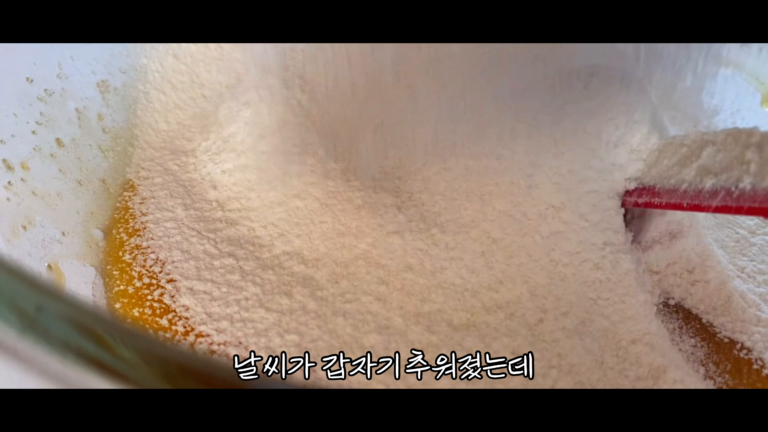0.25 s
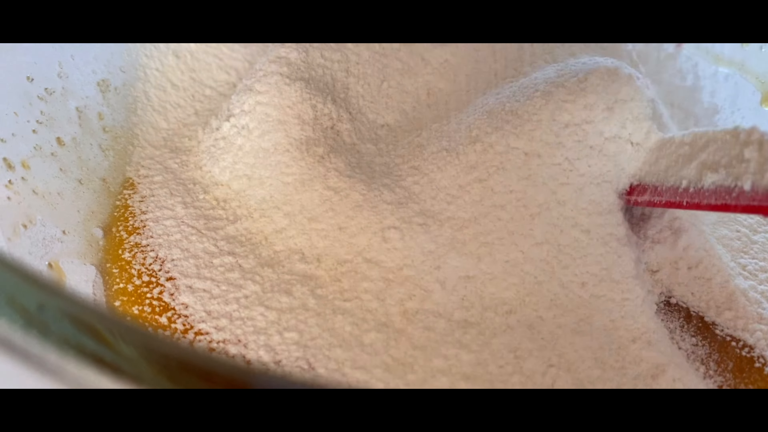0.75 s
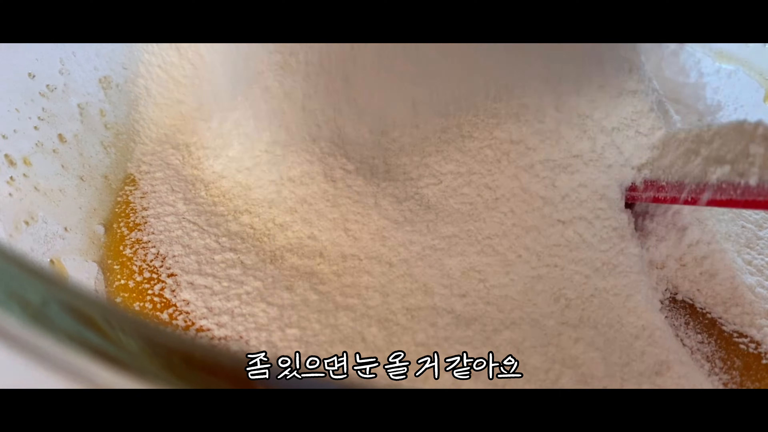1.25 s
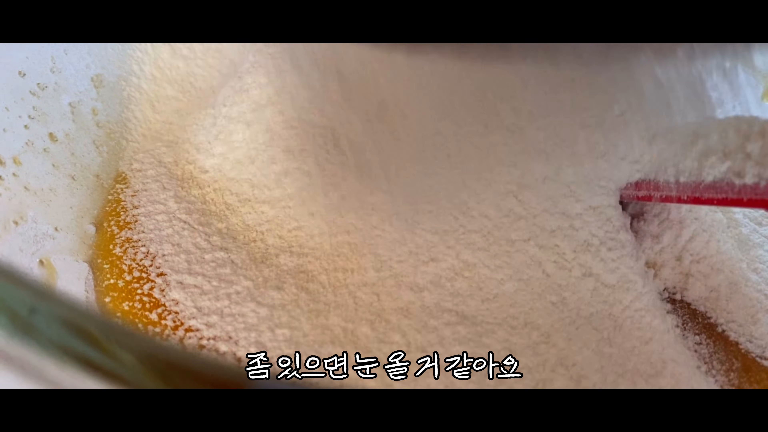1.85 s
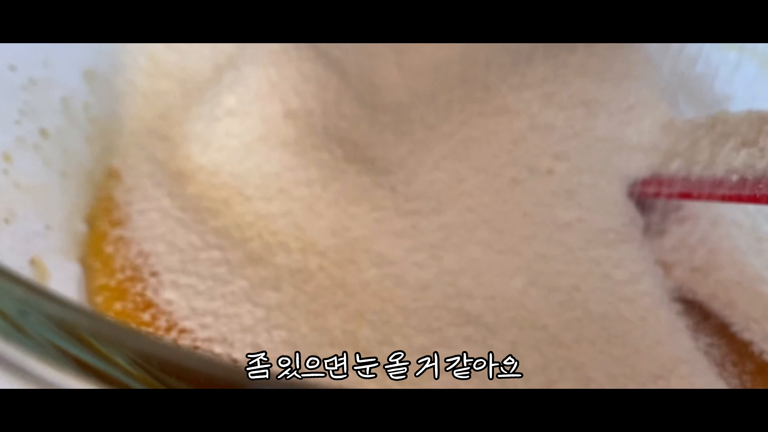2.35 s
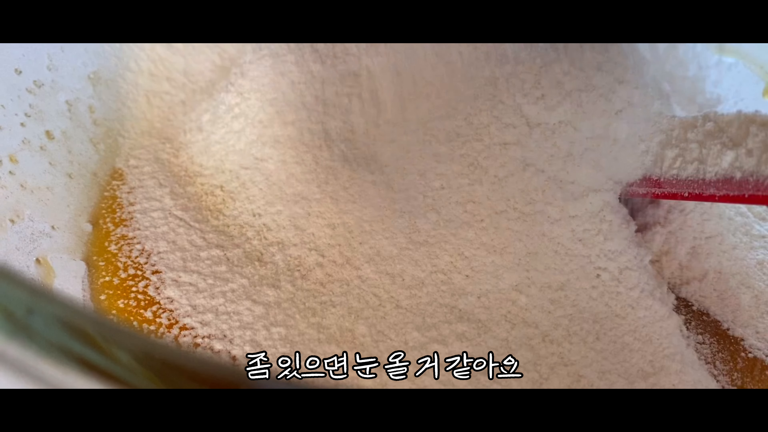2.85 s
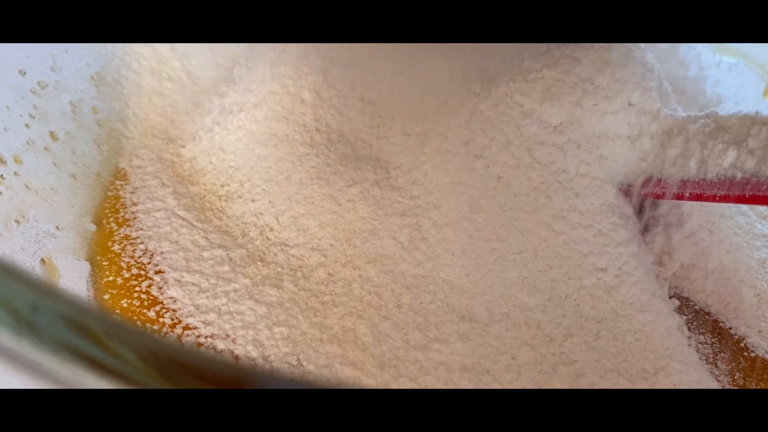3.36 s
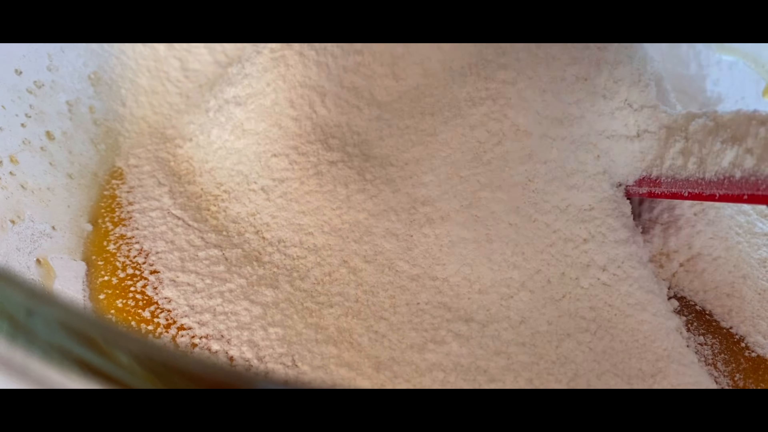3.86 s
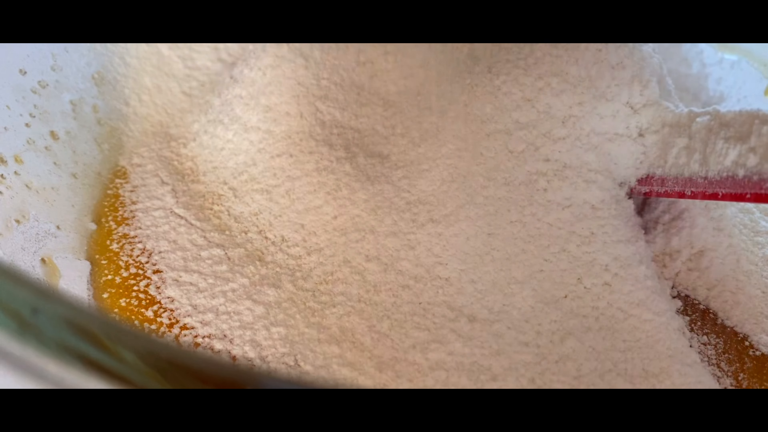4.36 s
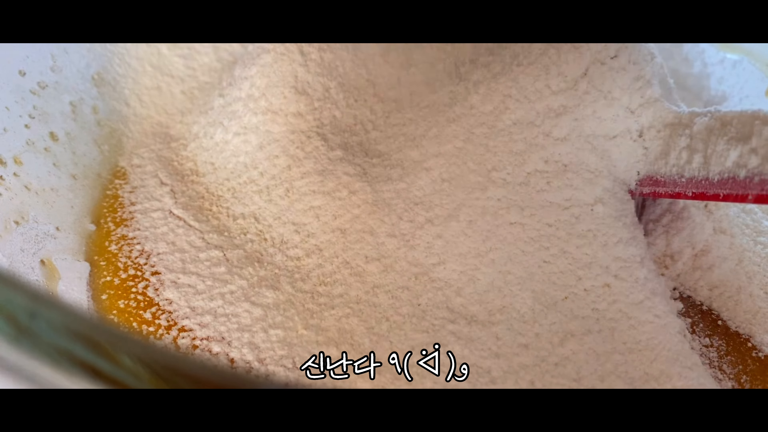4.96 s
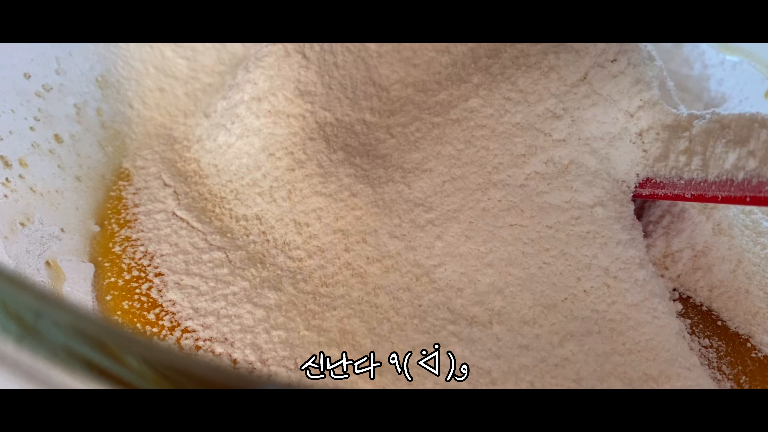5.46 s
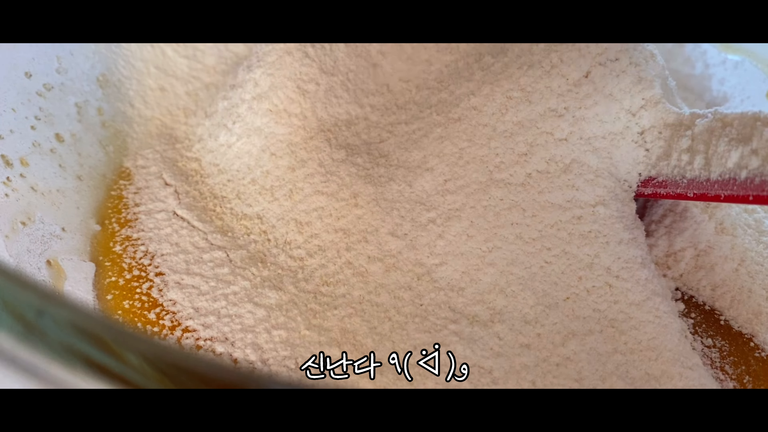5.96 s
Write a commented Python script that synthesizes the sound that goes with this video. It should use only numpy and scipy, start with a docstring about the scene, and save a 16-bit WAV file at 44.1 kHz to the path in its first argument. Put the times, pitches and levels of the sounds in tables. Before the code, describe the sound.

Steady rapid tapping of a fine mesh sieve, heard very close in stereo. Rounded thuds drop quickly in pitch, some purely bassy, others with a woody knock from bowl and worktop. Thin dry flour swishes surround every hit, and tiny metallic ticks are barely noticeable. The rhythm continues throughout, dipping softer at about a quarter of the way, over quiet room rumble and a faint appliance whine.

```python
"""Sifting flour by hand

Flour is sifted into a mixing bowl in a quiet kitchen, heard from close by. About five times a second
the sieve is swung against a hand: friction of flour on mesh gives a rising swish of noise, impact gives
a rim tick and a soft thud that dispersion makes fall in pitch, and the flour slides back as a second
swish. Reflections surround these sounds; behind them lie a low rumble, faint hiss and an appliance's whine."""
import sys
import numpy as np
from scipy import signal
from scipy.fft import rfft, irfft, next_fast_len
from scipy.io import wavfile

SR = 44100
rng = np.random.default_rng(int(sys.argv[2]) if len(sys.argv) > 2 else 0)


def wav_out(sig):
    """Save sig, one row per channel (or a flat mono array), as 16-bit PCM at SR to the path in sys.argv[1]."""
    wavfile.write(sys.argv[1], SR, np.round(np.clip(np.atleast_2d(sig).T, -1, 1) * 32767).astype(np.int16))


N = 273855
TIME = np.arange(N) / SR
HZ = np.maximum(np.fft.rfftfreq(next_fast_len(N + SR // 2), 1 / SR), 1)
SIZE = 2 * (len(HZ) - 1)

# Taps of the sieve on the hand. Each row: time in seconds, then relative levels in dB of the thud,
# its hardness (knock against thud), the rim tick and the flour swish.
TAPS = [(0.1384, -39.5, -8.0, -63.5, -77), (0.344, -42.5, -6, -71, -78.5),
        (0.5525, -43.5, -15.5, -62.5, -76.5), (0.7521, -44.5, -34.5, -76, -87.5),
        (0.9553, -42.5, -23.5, -72, -79.5), (1.157, -40.5, -23.5, -70.5, -77),
        (1.358, -42.5, -21.5, -69, -77.0), (1.5568, -49, -18, -92, -81), (1.7521, -55.5, -29, -97, -84.5),
        (1.9175, -41.0, -17, -72, -79), (2.1186, -41, -14, -64.5, -79), (2.3223, -42, -8, -66.5, -79.5),
        (2.5304, -43.5, -31, -75.5, -80), (2.717, -45.5, -5, -65, -78), (2.9105, -46, -7.5, -74.5, -84),
        (3.1042, -44.5, -8.5, -81, -83), (3.308, -43, -14.0, -67, -78.5), (3.5047, -46, -4, -67.5, -79.5),
        (3.7029, -46.5, -19.5, -72.5, -87.5), (3.9032, -44.5, -8.5, -71, -80.5),
        (4.1067, -46.5, -8, -72, -80.5), (4.3097, -44.0, -12, -69.5, -80.5), (4.51, -47, -9, -77, -82.5),
        (4.7146, -45.5, -9.5, -78, -77.5), (4.9153, -45, -10.5, -67.0, -77.5),
        (5.1193, -47, -6, -78.5, -79.5), (5.3214, -47.5, -7.0, -71.5, -82.5),
        (5.5335, -48.5, -5.5, -76, -82), (5.7488, -44.5, -20, -74.5, -79), (5.9494, -45, -9.0, -76, -82)]


def thuds():
    """Superposition: the thuds of all taps add linearly, tails overlapping."""
    out = np.zeros((2, N + SR))
    for s, thud_db, hardness_db, _, _ in TAPS:
        wave = thud(thud_db, hardness_db)
        start = round(s * SR)
        out[:, start:start + wave.shape[1]] += wave
    return out[:, :N]


# Colour of a fully hard thud. Each row: frequency in Hz, relative level in dB.
THUD_COLOUR = [(20, -37.5), (30, -24), (40, -11), (50, 2.5), (65, 2.5), (120, 1), (190, -7), (385, -3.5),
               (520, -16.5), (700, -19), (1000, -30.5), (1200, -27.5), (1450, -71)]
# Left-right balance of the thud. Each row: frequency in Hz, left above right in dB.
THUD_PAN = [(80, 0.8), (160, 1.0), (280, 4), (500, 9), (1000, 6)]
# Hollow modes of bowl and worktop. Each row: frequency in Hz, width in Hz, typical strength in dB.
HOLLOW_MODES = [(141, 17, -11.5), (193.5, 8, 2.5), (256.5, 9.6, 7), (358.2, 15.8, 0.5), (589, 19, 1),
                (642, 45, 7.5), (774, 17, 5.5), (824, 13, -2), (940, 22, 0.5), (1024, 54, 2.5)]
# A fleshy contact gives only bass, a bony one adds the knock.
# Each row: frequency in Hz, share of the hardness that applies.
HARDNESS_SHARE = [(90, 0), (190, 0.18), (370, 0.89), (720, 0.96)]
# First reflections off bowl and wall. Each row: delay in seconds, left level in dB, right level in dB.
ECHOES = [(.0076, -34, -8), (0.0217, -15, -17.5)]
THUD_GAIN_DB = 54.5
DELAY_CYCLES, DELAY_REFERENCE_HZ = 1.3065, 15.53


def thud(thud_db, hardness_db, size=16384, mode_spread_db=3.5, echo_low_cut_hz=200):
    """Dispersion and resonance: each pitch arrives equally many of its own cycles late, so the thud falls."""
    hz = np.maximum(np.fft.rfftfreq(size, 1 / SR), 1)
    dispersion = np.exp(-2j * np.pi * DELAY_CYCLES * np.log(hz / DELAY_REFERENCE_HZ))
    knock_db = hardness_db * at_hz(HARDNESS_SHARE, hz)
    contact = from_db(THUD_GAIN_DB + thud_db + knock_db + at_hz(THUD_COLOUR, hz))
    pan = from_db(at_hz(THUD_PAN, hz) * [[.5], [-.5]])
    # the hand never lands on quite the same spot, so each mode reaches each port with a new strength
    modes = 0
    for mode_hz, width_hz, mode_db in HOLLOW_MODES:
        strength = from_db(mode_db + mode_spread_db * rng.standard_normal((2, 1)))
        detuning = mode_hz / width_hz * (hz / mode_hz - mode_hz / hz)
        modes = modes + strength / (1 + 1j * detuning)
    # the first reflections return all but the bass
    high_pass = signal.butter(4, echo_low_cut_hz, "high", analog=True)
    low_cut = signal.freqs(*high_pass, hz)[1]
    echoes = 0
    for delay_s, left_db, right_db in ECHOES:
        echoes = echoes + from_db([[left_db], [right_db]]) * np.exp(-2j * np.pi * hz * delay_s)
    # the sieve moves between taps, so the later reflections are new each time
    paths = pan * (1 + modes) + low_cut * echoes + kitchen(hz)
    return irfft(dispersion * contact * paths)[:, :size // 2]


# Spectrum of the forward swish. Each row: frequency in Hz, relative density in dB per Hz.
SWISH = [(500, -11), (1000, 7.5), (1500, -2), (2400, -2), (2950, -3.5), (3500, -10.5), (4500, -2.5),
         (5300, -7.5), (7200, 1), (9500, -4.5), (11400, -0.5), (13500, -6), (15800, -9)]
# Spectrum of the slide back. Each row: frequency in Hz, relative density in dB per Hz.
BACK_SLIDE = [(1000, 10), (3000, -7), (5500, -4), (7500, 2.5), (9500, -3), (11300, 5.5), (12200, -2),
              (13000, 3), (14000, -3), (15800, -6.5)]
# an ordinary swing, and the time before the stop at which its swish sets in
USUAL_THUD_DB, USUAL_HARDNESS_DB, USUAL_SWISH_DB = -44, -10, -80
SWISH_RISE_S = 0.033
# weaker and softer taps come from slower swings: dB of slowness per dB
SLOW_PER_THUD, SLOW_PER_HARDNESS = .19, 0.09
# slide back: usual level, dB gained per dB of swish and of slowness, end after the tap, fade time
BACK_DB, BACK_PER_SWISH, BACK_PER_SLOWNESS = -81.5, 0.57, 1.8
BACK_HOLD_S, BACK_FADE_S = 0.092, .02
# the flour crunches as it piles up just before the stop: dB above the swish, lead, half-width
CRUNCH_DB, CRUNCH_LEAD_S, CRUNCH_S = 4.5, .0012, 0.0019


def flour(stop_s=0.0025, swish_db=8.0, fastest_before_s=0.0042, grain_db=1.0, clump_db=0.94):
    """Friction noise: flour speeds up until the stop, then slides back; slow swings lengthen the swish."""
    forward, back = np.zeros(N), np.zeros(N)
    for s, thud_db, hardness_db, _, slide_db in TAPS:
        slowness_db = SLOW_PER_THUD * (USUAL_THUD_DB - thud_db)
        slowness_db += SLOW_PER_HARDNESS * (USUAL_HARDNESS_DB - hardness_db)
        rise_s = SWISH_RISE_S * from_db(slowness_db)
        stopped = step(s, stop_s)
        speed = bell(s - fastest_before_s, rise_s - fastest_before_s)
        crunch = 1 + (from_db(CRUNCH_DB) - 1) * bell(s - CRUNCH_LEAD_S, CRUNCH_S)
        forward += from_db(slide_db + swish_db) * speed * crunch * (1 - stopped)
        # a slow swing leaves more flour to slide back
        back_db = BACK_DB + BACK_PER_SWISH * (slide_db - USUAL_SWISH_DB) + BACK_PER_SLOWNESS * slowness_db
        back += from_db(back_db) * stopped * (1 - step(s + BACK_HOLD_S, BACK_FADE_S))
    # fine grains and small lumps make the hiss uneven
    uneven = from_db(grain_db * drift(700) + clump_db * drift(40))
    return uneven * (forward * mesh_noise(SWISH) + back * mesh_noise(BACK_SLIDE))


# Stray clicks of the sieve. Each row: time in seconds, level in dB.
CLICKS = [(.400, -89), (6.046, -83)]
# Spectrum of the rim's contact noise. Each row: frequency in Hz, relative density in dB per Hz.
TICK = [(600, -19), (1300, 10), (1900, 9.5), (2400, 3), (2950, 0), (3600, -7), (5400, 0), (7000, -9.5),
        (9000, -10.5), (12000, -9.5), (15800, -16)]
# Spectrum of the rim's after-ring. Each row: frequency in Hz, relative density in dB per Hz.
RIM_RING = [(600, -16), (1200, -4.5), (1900, -3), (2900, -2), (3600, -16), (5400, 3.5), (7000, -1),
            (9000, -18), (15800, -27)]


def ticks(tick_db=4.5, contact_s=0.0027, rebound_s=0.0058, rebound_db=-10, ring_db=-13,
          ring_t60_s=0.24, click_s=0.001, rough_db=2.0):
    """Impact and damping: the metal rim ticks, rebounds once and buzzes briefly, damped by the flour."""
    force, ring = np.zeros(N), np.zeros(N)
    for s, click_db in CLICKS:
        force += from_db(click_db) * bell(s, click_s)
    for s, _, _, rim_db, _ in TAPS:
        rebound = from_db(rebound_db) * bell(s + rebound_s, contact_s)
        force += from_db(rim_db + tick_db) * (bell(s, contact_s) + rebound)
        decay_db = -60 * np.clip((TIME - s) / ring_t60_s, 0, 2)
        ring += (TIME > s) * from_db(rim_db + ring_db + decay_db)
    rough_force = force * from_db(rough_db * drift(760))
    return rough_force * mesh_noise(TICK) + ring * mesh_noise(RIM_RING)


# Direct sound from the mesh. Each row: frequency in Hz, share of the power that arrives straight.
DIRECT_SHARE = [(1000, .05), (5500, .2), (7000, .6), (9000, .985), (16000, .995)]
PORT_LAG_S = .000225


def mesh_noise(colour):
    """Direct and diffuse fields: the straight part reaches the left port late and in opposite phase."""
    share = np.clip(at_hz(DIRECT_SHARE), 0, 1)
    left_port = -np.exp(-2j * np.pi * HZ * PORT_LAG_S)
    ports = np.array([left_port, np.ones(len(HZ))])
    direct = np.sqrt(share) * ports * white(1)
    return coloured(direct + np.sqrt(1 - share) * diffuse(), colour)


# Kitchen reverberation. Each row: frequency in Hz, level against the direct sound in dB.
KITCHEN = [(40, -19), (110, -10), (200, -10), (350, -3), (700, 5), (1500, -5), (4000, -3.5), (9000, -19.5),
           (16000, -24)]
KITCHEN_T60_S = 0.24


def kitchen(hz=HZ, first_echo_s=.005):
    """Reverberation: response of dense reflections from worktop and walls, decaying exponentially."""
    scatter = rms_one(irfft(diffuse(hz)))
    t = np.arange(scatter.shape[1]) / SR
    decay = (t > first_echo_s) * from_db(-60 * np.minimum(t / KITCHEN_T60_S, 2))
    unit_decay = decay / np.sqrt(np.sum(decay ** 2))
    return rfft(scatter * unit_decay) * from_db(at_hz(KITCHEN, hz))


# Spectrum of the room noise. Each row: frequency in Hz, relative density in dB per Hz.
BACKGROUND = [(20, -7.5), (45, -11.5), (62, 7.5), (85, -9), (140, -6), (200, 0), (300, -2.5), (400, -8.5),
              (500, -13.5), (700, -18), (1000, -21.5), (1500, -26.5), (2350, -22), (2550, -49.5)]
# Spectrum of the faint hiss. Each row: frequency in Hz, relative density in dB per Hz.
AIR = [(1500, -24), (2600, 4), (3500, -2.5), (5800, -1.5), (6100, 5.5), (6450, 6.5), (6700, -1),
       (9000, -12.5), (13000, -8.5), (15800, -20)]
# Whine of the appliance. Each row: frequency in Hz, typical level in dB.
WHINE = [(1809, -93.5), (1922, -96), (2094, -90), (2181, -99), (2314, -94), (2404, -100), (6207, -103)]
# Course of the low room rumble. Each row: time in seconds, relative level in dB.
RUMBLE = [(0.05, -64), (0.27, -64.5), (1.29, -65.5), (1.58, -69), (2.28, -63.5), (3.63, -68), (4.79, -67),
          (6.15, -69)]
BACKGROUND_DB, AIR_DB = -63.5, -87.5
# share of the rumble's course that applies, random waver on top of it, upper edge of the rumble
RUMBLE_SWING, RUMBLE_WAVER_DB, RUMBLE_TOP_HZ = 0.77, 1.5, 610


def background(waver_rad=1.1, waver_db=3.0):
    """Modulation: rumble wavers in level, whine tones in level and phase, over a steady faint hiss."""
    room_spectra = diffuse() / (1 + (HZ / 3000) ** 8)
    room = from_db(BACKGROUND_DB) * coloured(room_spectra, BACKGROUND)
    rumble = irfft(rfft(room, SIZE) / (1 + (HZ / RUMBLE_TOP_HZ) ** 4))[:, :N]
    rumble_db = np.interp(TIME, *np.transpose(RUMBLE))
    swing_db = RUMBLE_SWING * (rumble_db - rumble_db.mean())
    swell = from_db(swing_db + RUMBLE_WAVER_DB * drift(8))
    hiss = from_db(AIR_DB) * coloured(diffuse(), AIR)
    out = room + (swell - 1) * rumble + hiss
    for hz, db in WHINE:
        phase = 2 * np.pi * hz * TIME + waver_rad * drift(2.5) + rng.uniform(0, 2 * np.pi)
        level = from_db(db + waver_db * drift(11.0))
        # the whine reaches the two ports out of step
        out += level * np.sqrt(2) * np.sin(phase + [[0], [2]])
    return out


# Coherence of the diffuse field. Each row: frequency in Hz, left-right likeness from -1 to 1.
LIKENESS = [(60, 0.92), (200, 0.96), (380, 0.83), (600, 0.48), (900, -0.23), (1500, -0.24), (2300, -0.54),
            (2700, 0.35), (16000, -0.2)]


def diffuse(hz=HZ):
    """Diffuse-field coherence: noise from all around is closely alike in both channels in the bass only."""
    mid, side = white(2, hz)
    alike = np.clip(at_hz(LIKENESS, hz), -1, 1)
    return np.sqrt((1 + alike) / 2) * mid + np.sqrt((1 - alike) / 2) * side * [[1], [-1]]


def white(count, hz=HZ):
    """White noise: spectra of unrelated signals with equal mean power at every frequency."""
    return rfft(rng.standard_normal((count, 2 * (len(hz) - 1))))


def coloured(spectra, colour):
    """Linear filtering: shape noise spectra by a colour and return sound of unit rms."""
    return rms_one(irfft(spectra * from_db(at_hz(colour)))[..., :N])


def drift(rate_hz):
    """Random modulation: low-passed noise of unit rms."""
    return rms_one(irfft(white(1)[0] / (1 + (HZ / rate_hz) ** 2))[:N])


def bell(centre_s, width_s):
    """Gaussian pulse: a smooth swell of height 1."""
    out = np.zeros(N)
    near = np.abs(TIME - centre_s) < 10 * width_s
    out[near] = np.exp(-((TIME[near] - centre_s) / width_s) ** 2)
    return out


def step(centre_s, width_s):
    """Smooth transition: a hyperbolic-tangent rise from 0 to 1."""
    return .5 + .5 * np.tanh((TIME - centre_s) / width_s)


def at_hz(points, hz=HZ):
    """Logarithmic pitch: interpolate a table on a log-frequency axis."""
    f, value = np.transpose(points)
    return np.interp(np.log(hz), np.log(f), value)


def from_db(db):
    """Decibel law: 20 dB is a tenfold amplitude."""
    return 10 ** (np.asarray(db) / 20)


def rms_one(x):
    """Mean power: scale to unit rms."""
    return x / np.sqrt(np.mean(x ** 2) + 1e-20)


def scene():
    """Superposition: thuds, flour and rim with their reflections, over the background."""
    mesh = flour() + ticks()
    mesh_in_room = irfft(rfft(mesh, SIZE) * (1 + kitchen()))[:, :N]
    return thuds() + mesh_in_room + background()


CUTOFF_HZ = 15800


def record(dry):
    """Band limiting: a steep zero-phase low-pass cuts off the top."""
    return irfft(rfft(dry, SIZE) / np.sqrt(1 + (HZ / CUTOFF_HZ) ** 400))[:, :N]


dry = scene()
out = record(dry)
wav_out(out)
```